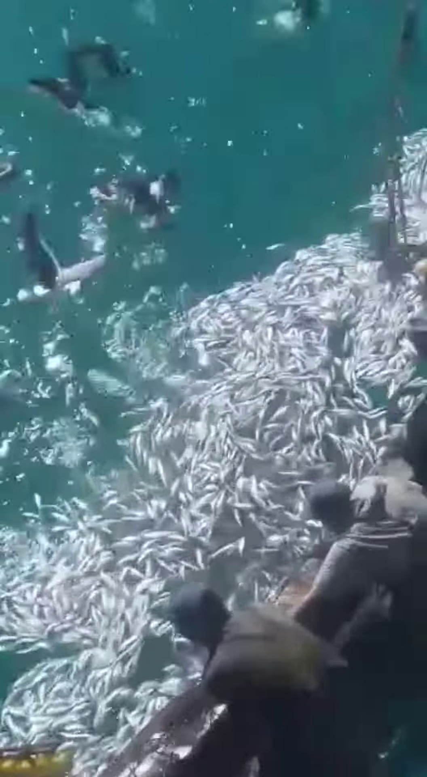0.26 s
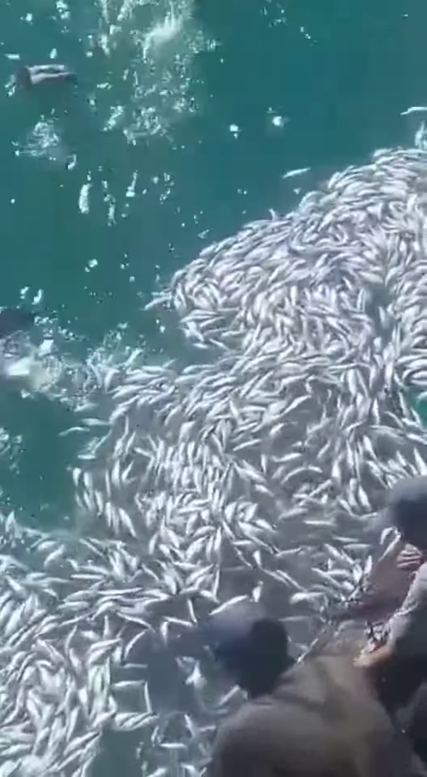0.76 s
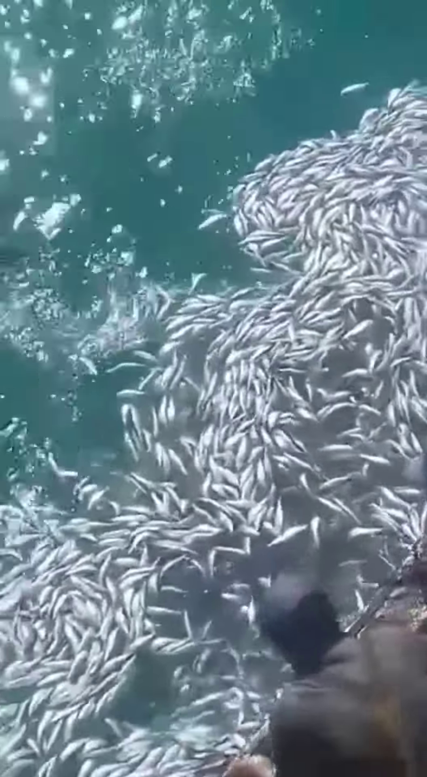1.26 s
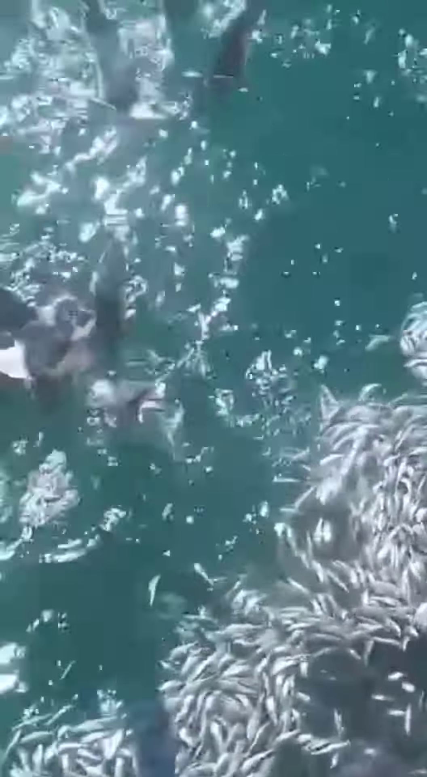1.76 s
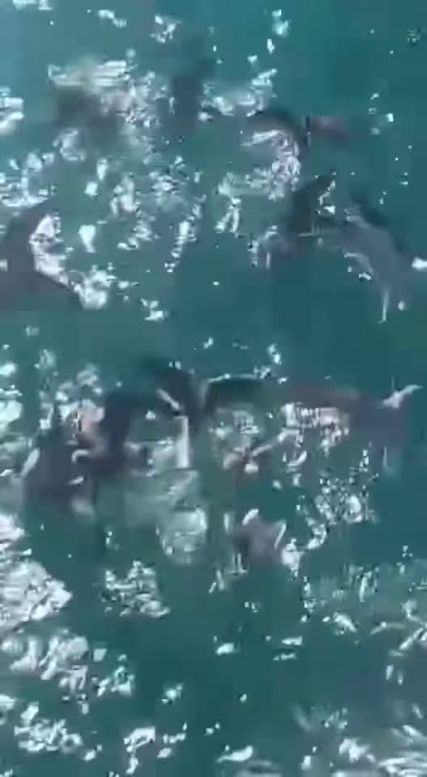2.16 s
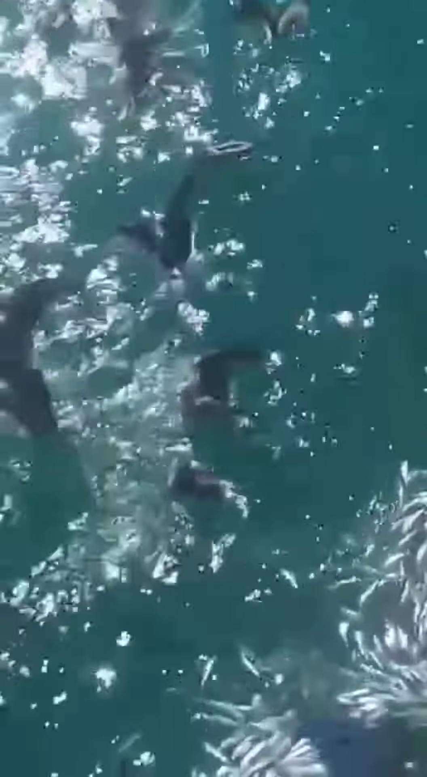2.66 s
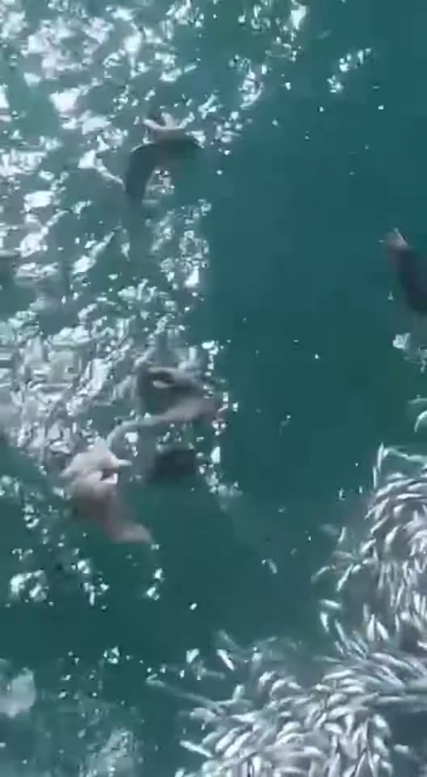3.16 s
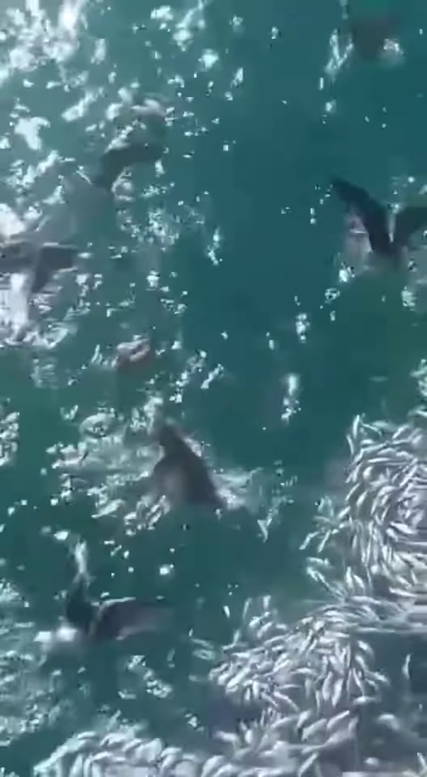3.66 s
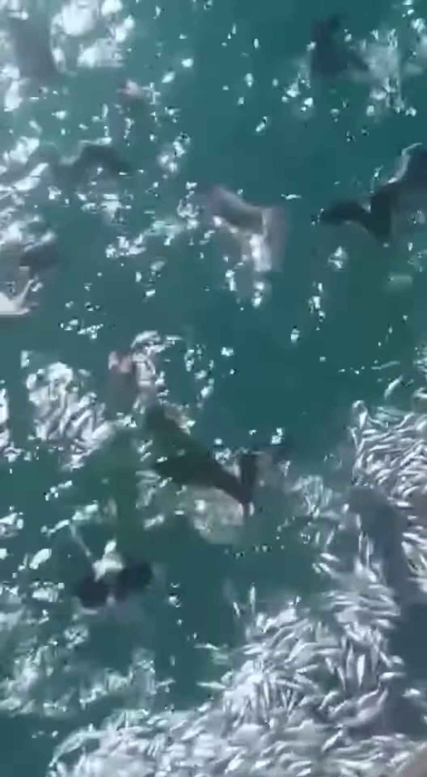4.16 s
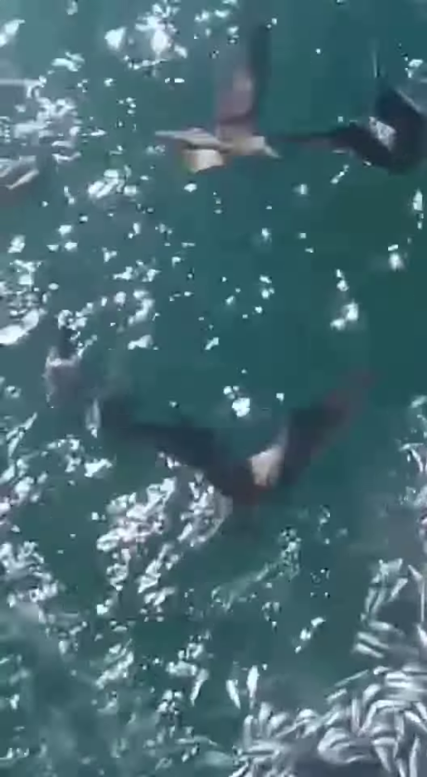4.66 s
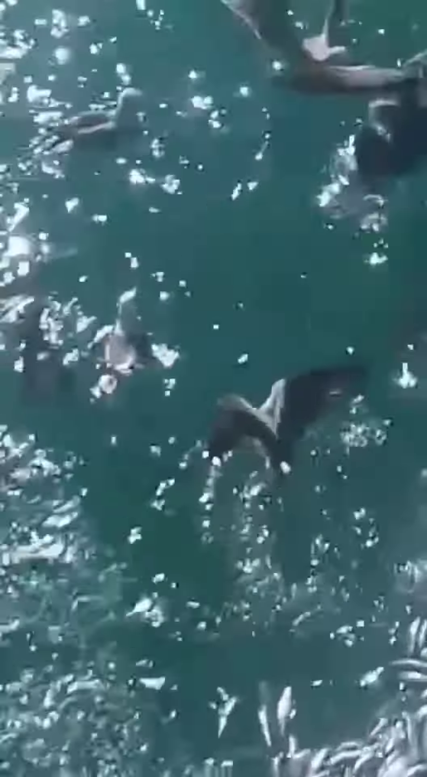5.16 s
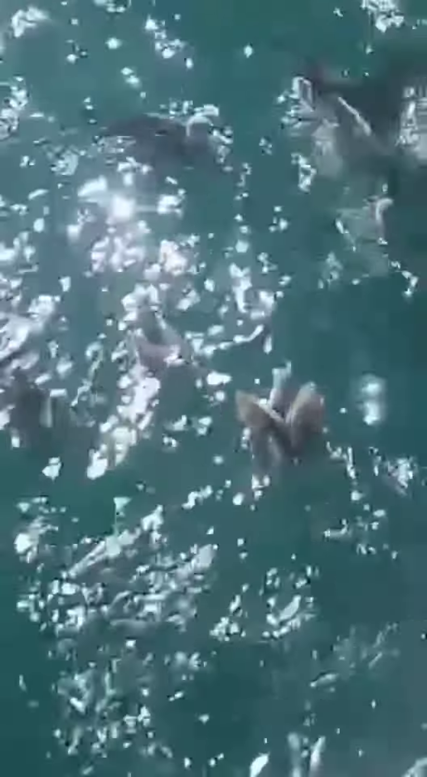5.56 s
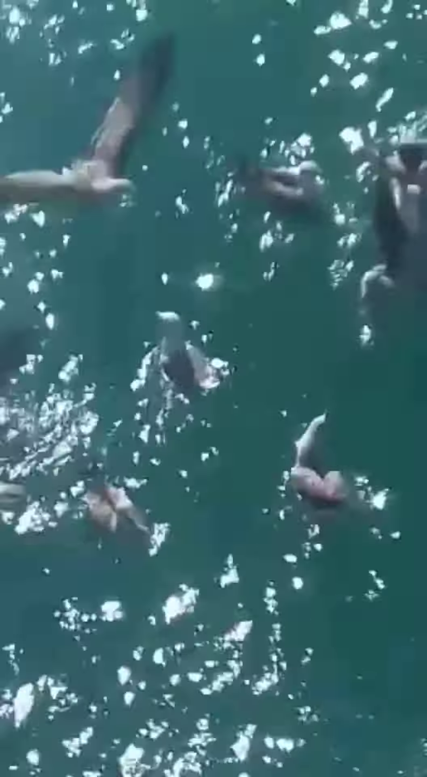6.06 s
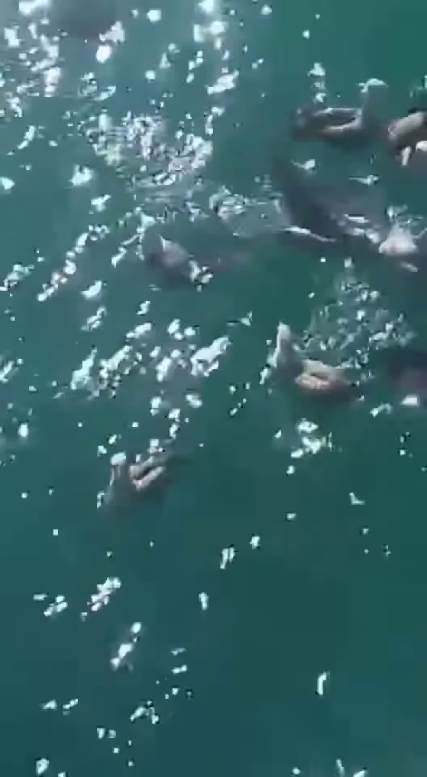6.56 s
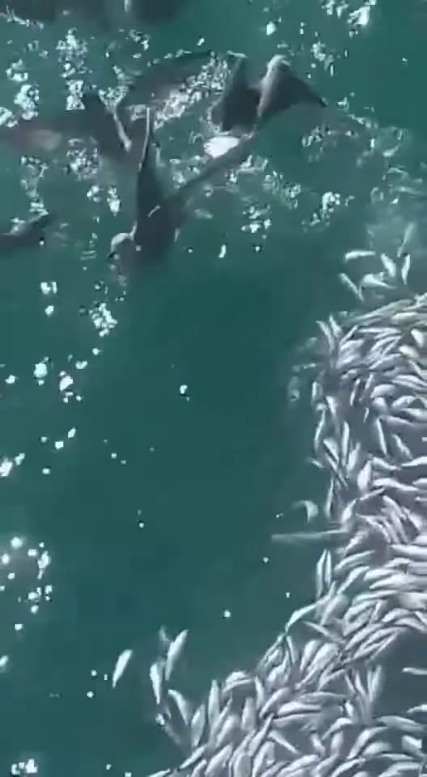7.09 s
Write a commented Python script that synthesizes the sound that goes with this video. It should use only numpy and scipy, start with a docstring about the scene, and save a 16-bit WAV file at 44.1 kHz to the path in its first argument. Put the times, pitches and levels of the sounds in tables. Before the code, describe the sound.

A huge flock of seabirds screams all at once over open water. Short, trembling near cries and rattling cackles jump out of a thick, hoarse, hissing crowd. Beneath lie a soft low wash and a faint idling engine. Small wind puffs bump the microphone early on, then dull hull knocks come, clustered past the middle. Handheld outdoor microphone on a boat, mono, no echo.

```python
"""Gulls scream over open water beside a boat: near cries stand out of a far crowd of hoarse ones.
Each cry is a trembling stack of sine partials; the crowd is about 1900 short cries mixed with hiss.
Under them lie the wash of the sea (filtered noise) and the drone of an idling engine (wavering tones).
Wind puffs (noise bursts) hit the microphone, the hull is knocked (ringing tones), and two tiny ticks sound."""
import sys
import numpy as np
from scipy import signal
from scipy.fft import rfft, irfft
from scipy.io import wavfile
from scipy.ndimage import uniform_filter1d

SR = 44100
rng = np.random.default_rng(int(sys.argv[2]) if len(sys.argv) > 2 else 0)


def bounce(signal):
    """Save signal as a 16-bit WAV file at the path given by the first command-line argument."""
    frames = np.transpose(np.atleast_2d(signal))
    limited = np.clip(frames, -1, 1)
    pcm = np.round(limited * 32767).astype(np.int16)
    wavfile.write(sys.argv[1], SR, pcm)


N = 323164  # length in samples, about 7.3 s


def amp(db):
    """Turns decibels into a plain factor."""
    return 10 ** (np.asarray(db) / 20)


def evened(x):
    """Scales a sound to an rms level of 1."""
    return x / np.sqrt(np.mean(x ** 2) + 1e-20)


def read(points, hz):
    """Reads a spectrum table, joining its points by straight lines on a log-frequency axis."""
    table_hz, value = np.transpose(points)
    return np.interp(np.log(hz + 1), np.log(table_hz + 1), value)


def add(mix, start_s, sound):
    """Adds a sound at a time, cutting what falls outside."""
    at = round(start_s * SR)
    sound = sound[max(-at, 0):]
    part = mix[max(at, 0):][:len(sound)]
    part += sound[:len(part)]


def wander(n, seconds):
    """A random curve: chance values the given time apart, joined by straight lines."""
    knots = rng.standard_normal(int(8 / seconds) if n > SR else 400)
    return np.interp(np.arange(n) / (seconds * SR), np.arange(len(knots)), knots)


def cry(hz, partials_db, jitter, flutter_db):
    """A voice as a stack of partials: the pitch trembles, the whole throbs, each partial flutters alone."""
    n = len(hz)
    shake = wander(n, 0.003966) + wander(n, 0.02003)
    turns = np.cumsum(hz * (1 + jitter * shake)) / SR + rng.random()
    throb = amp(flutter_db * wander(n, 0.00723))
    stack = np.zeros(n)
    for k, db in enumerate(np.atleast_1d(partials_db), 1):
        flutter = flutter_db * wander(n, 0.01527)
        stack += amp(db + flutter) * np.sin(2 * np.pi * k * turns)
    return throb * stack


def near_gulls():
    """Each near cry glides in pitch while it swells to its peak and fades; cackles pulse as well."""
    # near cries: start_s, length_s, first-partial from_hz and to_hz,
    # peak_db (before the voice's own partial levels), peak_place (0-1, held within 0.1-0.9), voice
    cries = [ (0.0, 0.055, 1180, 1280, -22, .4, "shrill"), (.2, 0.087, 1450, 1475, -18.5, 0.9, "pure"),
             (0.204, 0.053, 5630, 5480, -22, .45, "pure"), (0.228, 0.068, 974, 903, -15, 0.56, "nasal"),
             (0.286, .11, 1420, 1341, -23, 0.16, "open"), (.345, .105, 1250, 1110, -14.5, .3, "bright"),
             (0.329, .05, 5700, 5480, -25.5, 0.5, "pure"), (0.418, 0.14, 1700, 1630, -24, 0.5, "nasal"),
             (0.442, .13, 1420, 1330, -23.5, .5, "pure"), (0.501, 0.11, 1302, 1326, -31, .7, "open"),
             (0.728, 0.085, 1453, 1330, -18, 0, "pure"), (.782, 0.082, 1482, 1490, -28, 0.2, "open"),
             (.8, .13, 1215, 1140, -19, .5, "shrill"), (.87, 0.1, 1530, 1490, -13, 0.52, "cackle"),
             (0.904, 0.2, 1444, 1417, -15.5, 0.35, "cackle"), (.975, 0.08, 6750, 6270, -30, 0.8, "pure"),
             (1.032, 0.27, 1335, 1463, -20, .6, "cackle"), (1.054, 0.12, 2800, 2810, -24, 0.52, "cackle"),
             (1.093, .21, 1513, 1500, -22.5, 0.55, "cackle"), (1.13, 0.068, 5900, 5850, -29, 0.4, "pure"),
             (1.241, 0.027, 1580, 1790, -14.5, .6, "pure"), (1.32, .37, 1203, 1190, -14, .6, "held"),
             (1.331, 0.12, 3000, 2990, -22.5, 0.3, "pure"), (1.385, 0.035, 2276, 2120, -14, 0.4, "pure"),
             (1.653, .095, 6800, 6230, -35, 0.8, "pure"), (1.845, 0.048, 1500, 1460, -25, 0.7, "pure"),
             (1.924, 0.025, 1430, 1420, -26, 0.6, "pure"), (1.958, 0.081, 1430, 1500, -27, 0.25, "open"),
             (2.071, 0.077, 1480, 1413, -28, 0.9, "open"), (2.055, 0.079, 1789, 1810, -28.5, 0.9, "nasal"),
             (2.212, .12, 1375, 1336, -26, 0, "open"), (2.22, .13, 1290, 1189, -24.5, 0.7, "pure"),
             (2.226, 0.1, 2720, 2703, -25, 0.4, "pure"), (2.279, .09, 3040, 2970, -25, .6, "pure"),
             (2.36, 0.12, 1330, 1260, -33, 0.7, "open"), (2.407, 0.093, 1250, 1260, -21, 0.4, "nasal"),
             (2.464, 0.11, 1600, 1498, -21, 0.6, "nasal"), (2.58, 0.19, 1500, 1504, -16, .35, "cackle"),
             (2.594, 0.099, 1430, 1448, -16.5, 0.6, "pure"), (2.644, 0.093, 1300, 1275, -13, .4, "held"),
             (2.725, 0.084, 1278, 1259, -9.5, 0.2, "held"), (2.805, .1, 1490, 1440, -18, .5, "cackle"),
             (2.946, 0.21, 1422, 1296, -14, .3, "cackle"), (3.187, 0.11, 1437, 1250, -18.5, 0.4, "pure"),
             (3.279, .14, 2320, 2150, -15, 0.73, "cackle"), (3.384, .1, 1585, 1640, -24, 0.1, "pure"),
             (3.511, 0.035, 2630, 2380, -24, .4, "pure"), (3.428, .027, 1310, 1350, -15, .45, "nasal"),
             (3.455, .022, 1300, 1200, -14, .4, "nasal"), (3.478, .025, 1370, 1380, -16, .4, "nasal"),
             (3.5, .025, 1560, 1530, -16, .5, "nasal"), (3.535, .027, 1370, 1330, -16, .5, "nasal"),
             (3.56, .025, 1290, 1160, -14, .5, "nasal"), (3.572, 0.26, 2580, 2417, -13, .35, "cackle"),
             (3.601, 0.11, 1510, 1530, -29, 0.6, "open"), (3.639, 0.1, 2524, 2300, -35, 0.7, "pure"),
             (3.847, 0.26, 1510, 1310, -18, 0.63, "pure"), (3.911, .11, 1410, 1294, -24.5, 0.33, "shrill"),
             (3.888, 0.13, 2900, 2560, -16, 0.64, "cackle"),
             (3.975, 0.093, 2470, 2590, -16.5, 0.53, "pure"), (3.97, .07, 6300, 6600, -36, .6, "pure"),
             (4.022, 0.3, 1650, 1393, -23, 0.97, "reedy"), (4.074, .035, 2620, 3070, -17, 0.3, "pure"),
             (4.118, 0.059, 2900, 2520, -14, 0.8, "pure"), (4.214, 0.091, 1100, 1060, -19, 0.4, "nasal"),
             (4.16, 0.17, 2960, 2960, -12, 0.3, "cackle"), (4.258, 0.29, 2936, 2680, -17.5, 0.2, "cackle"),
             (4.3, 0.15, 1568, 1487, -24, 1, "pure"), (4.361, 0.095, 1850, 1790, -25, 0.2, "nasal"),
             (4.405, 0.065, 1440, 1464, -27, 0.7, "shrill"), (4.444, 0.14, 2390, 2270, -20.5, .5, "pure"),
             (4.512, 0.16, 1460, 1365, -24.5, .7, "pure"), (4.663, 0.12, 1290, 1455, -22, 0, "open"),
             (4.756, 0.16, 1416, 1317, -23.5, 0, "open"), (4.706, 0.037, 5630, 5600, -28.5, 0.65, "pure"),
             (4.717, .1, 1825, 1730, -17.5, .3, "pure"), (4.901, .2, 1395, 1377, -21, .5, "cackle"),
             (4.875, 0.064, 3250, 3320, -25, .5, "pure"), (4.95, 0.063, 3300, 3350, -19, 0.62, "pure"),
             (4.875, 0.22, 1924, 1760, -13.5, 0.3, "cackle"),
             (4.991, 0.12, 2486, 2250, -15.5, 0.45, "pure"), (5.209, 0.14, 2510, 2870, -17.5, 0.67, "pure"),
             (5.3, .16, 2880, 2730, -16.5, 0.64, "pure"), (5.4, .13, 3420, 3280, -27, .6, "pure"),
             (5.397, 0.19, 1435, 1430, -22.5, 0.36, "pure"), (5.468, 0.23, 1516, 1420, -13, .55, "cackle"),
             (5.59, 0.061, 1370, 1350, -28, 1, "open"), (5.778, 0.11, 1450, 1353, -19.5, 1, "pure"),
             (5.834, 0.14, 1485, 1394, -31, .5, "open"), (5.987, 0.13, 1280, 1205, -23.5, 0, "pure"),
             (6.023, 0.092, 1680, 1560, -24.5, 0.85, "nasal"), (6.134, 0.067, 2350, 2280, -21, .5, "pure"),
             (6.241, 0.069, 2390, 2460, -21.5, 0.34, "cackle"),
             (6.342, 0.074, 2470, 2510, -24, 0.6, "pure"), (6.405, 0.18, 1370, 1300, -23, 0.47, "cackle"),
             (6.512, 0.14, 7000, 6750, -45, 0.4, "pure"), (6.52, .19, 1310, 1175, -23, .55, "held"),
             (6.524, 0.085, 3640, 3370, -35, .6, "pure"), (6.589, 0.11, 1135, 1364, -20, 0, "cackle"),
             (6.673, 0.068, 1010, 1120, -26, 0, "pure"), (6.962, 0.2, 2410, 2370, -19.5, 0.57, "cackle"),
             (7.12, .05, 6600, 7000, -46, .5, "pure"), (7.144, 0.024, 2230, 1890, -16, 0.85, "pure"),
             (7.197, 0.031, 2130, 1840, -17.5, 0.8, "pure"), (7.22, .09, 2830, 2860, -22.5, 0.8, "pure"),
             (7.254, .035, 2505, 2650, -13.5, 0.24, "pure"), (7.292, 0.041, 2570, 2710, -14, .6, "pure"), ]
    # kinds of voice: name, then the level_db of each partial, lowest first
    voices = {"pure": (0,), "open": (5, -1, -7, -12.5, -59), "nasal": (-36, -2, -28, -14.5, -48, -33.5),
              "shrill": (-10, -4, 0, -15), "bright": (-8, 0, -11, -7, -24, -20, -24, -31),
              "held": (-33, -3, -17, -24.5, -30, -38.5), "reedy": (-28, 3, -33, -11.5, -30, -26),
              "cackle": (0,)}
    swell_db, fade_db = 6.5, 10  # how far below its peak a cry begins and ends
    ends_s = 0.018  # longest soft end; short cries use a quarter of their length
    glide = .85  # below 1 the pitch moves fastest at the start
    cackle_per_s, cackle_bend, cackle_db = 29, .018, 4  # pulse rate, pitch bend (share), level swing each way

    out = np.zeros(N)
    for start_s, length_s, from_hz, to_hz, peak_db, peak_at, kind in cries:
        t = np.arange(0, length_s, 1 / SR)
        u = t / length_s
        peak_at = np.clip(peak_at, .1, .9)
        cackles = kind == "cackle"
        pulse = cackles * np.cos(2 * np.pi * cackle_per_s * (t - peak_at * length_s))
        # the slope of the pulse, scaled to the range -1 to 1, bends the pitch
        slope = np.gradient(pulse) * SR / (2 * np.pi * cackle_per_s)
        hz = (from_hz + (to_hz - from_hz) * u ** glide) * (1 + cackle_bend * slope)
        db = peak_db - np.interp(u, [0, peak_at, 1], [swell_db, 0, fade_db])
        db = db + cackle_db * (pulse - cackles)
        voice = cry(hz, voices[kind], jitter=.004, flutter_db=1.6)
        ends = np.minimum(np.minimum(t, length_s - t) / min(ends_s, length_s / 4), 1)
        add(out, start_s, amp(db) * voice * np.sin(np.pi / 2 * ends) ** 2)
    return out


def crowd_cries():
    """Short cries at chance moments arch and mostly fall in pitch, while pitch and strength pulse."""
    cries_per_s, span_s = 250, 7.6
    out = np.zeros(N)
    # each row of chance numbers is one cry; the last nine set its partials, two of them its pulse too
    for at, long, pitch, fall, loud, *throat in rng.random((int(cries_per_s * span_s), 14)):
        u = np.linspace(0, 1, int(SR * (.035 + .14 * long ** 2)))
        hz = 980 * 2 ** (.8 * pitch) * (1 + .04 * np.sin(np.pi * u) - 0.094 * fall * u)
        pulses_per_s = 18 + 22 * throat[0]
        beat = 2 * np.pi * (np.arange(len(u)) * pulses_per_s / SR + throat[1])
        hz = hz * (1 + .014 * fall * np.sin(beat))
        cackle = 1 + .45 * np.cos(beat)
        voice = cry(hz, -18 * np.array(throat), jitter=.009, flutter_db=2.5)
        swell = abs(np.sin(np.pi * u)) ** 0.1
        add(out, span_s * at - .25, amp(6.6 * loud) * cackle * voice * swell)
    return out


def crowd():
    """The far cries and a hiss share one tone colour, then follow a changing level and treble tilt."""
    # the crowd over time: time_s, level_db (before the 1.5 dB cut at the end), treble_tilt_db per octave
    crowd_course = [(0.0, -16, -3.5), (0.3, -18, 2), (0.57, -20.5, 2), (1.63, -18, 1), (1.79, -25.5, -0.5),
                    (1.98, -20, -1.5), (2.08, -24, 6), (2.12, -20.5, 2), (2.62, -14.5, 0.5),
                    (3.12, -18.5, 1.3), (3.18, -20.5, 2.5), (3.45, -21.5, -1.3), (3.69, -17.5, -1.7),
                    (3.84, -20.5, 1), (3.95, -18, -.5), (4.14, -19, 2.5), (4.6, -19.5, 0), (5.0, -18.5, 2),
                    (5.39, -17, 0), (5.95, -20.5, 2.5), (6.37, -22, 0.5), (6.45, -28, -0.5),
                    (6.86, -23.5, -0.5), (7.07, -27.5, -1.2), (7.33, -22.5, 2.5)]
    # tone colour of the crowd: pitch_hz, relative level_db per Hz
    crowd_colour = [(260, -23), (450, -53), (614, -6), (671, -10), (734, -26.5), (1080, -17), (1430, -1),
                    (1780, -3), (2430, 0.5), (3740, -14), (5340, -19.5), (7280, -29.5), (8700, -31.5),
                    (15500, -56.5)]
    hz, t, z = signal.stft(crowd_cries(), SR, nperseg=1024, noverlap=768)

    # flatten the cries' average spectrum, then colour them together with hiss
    z /= uniform_filter1d(np.sqrt((abs(z) ** 2).mean(1)), size=9)[:, None] + 1e-9
    blur = (rng.standard_normal(z.shape) + 1j * rng.standard_normal(z.shape)) / np.sqrt(2)
    voiced = (hz > 1000) / (1 + (hz / 11500) ** 4)  # below and far above the voices only hiss is left
    z = amp(read(crowd_colour, hz))[:, None] * (z * voiced[:, None] + amp(-3) * blur)
    z /= np.sqrt(uniform_filter1d((abs(z) ** 2).mean(0), size=40))  # even out the level over time

    time_s, level_db, tilt_db = np.transpose(crowd_course)
    flicker_db = 1.06 * wander(N, 0.044)[np.minimum(t * SR, N - 1).astype(int)]  # the treble flickers
    octaves = np.log2(np.clip(hz, 3000, 10000) / 3000)[:, None]
    tilt = amp(octaves * (np.interp(t, time_s, tilt_db) + flicker_db))
    shaped = z * tilt * amp(np.interp(t, time_s, level_db))
    flat = signal.istft(z, SR, nperseg=1024, noverlap=768)[1][:N]
    sound = signal.istft(shaped, SR, nperseg=1024, noverlap=768)[1][:N]
    return amp(-1.5) * sound / np.sqrt(np.mean(flat ** 2))


def sea():
    """Low wash of water along the hull: noise shaped by a spectrum, lumpy in time."""
    # tone colour of the wash: pitch_hz, relative level_db per Hz
    wash_colour = [(13, -38), (22, -9.5), (129, -2.5), (179, -3), (307, 1.5), (447, -7), (535, -9),
                   (673, -8), (767, -4), (1100, -10), (1430, -62), (2420, -120)]
    colour = amp(read(wash_colour, np.fft.rfftfreq(N, 1 / SR)))
    wash = irfft(rfft(rng.standard_normal(N)) * colour, N)
    lumps_db = 1.2 * wander(N, .05)
    return amp(-35 + lumps_db) * evened(wash)


def engine():
    """Low engine tones whose strength and phase waver."""
    # engine tones: pitch_hz, level_db (rms, before the wavering)
    tones = [(34.8, -58), (52.2, -76), (70, -58), (140, -49), (312, -48), (678, -46.5)]
    t = np.arange(N) / SR
    out = np.zeros(N)
    for hz, db in tones:
        strength = np.sqrt(2) * amp(db + 3.6 * wander(N, .06))
        phase = 0.28 * wander(N, .05)  # radians
        out += strength * np.sin(2 * np.pi * hz * t + phase)
    return out


def wind():
    """Each puff on the microphone is a short burst of low noise with soft ends."""
    # wind puffs: start_s, level_db (rms before the soft ends), top_hz (at least 140 is used),
    # length_s (cut to 0.136 s at most)
    puffs = [(0.0, -38, 170, .3), (0.104, -25, 320, 0.029), (0.172, -15.5, 444, 0.023),
             (0.194, -27, 398, 0.019), (0.238, -32, 340, 0.026), (0.825, -20.5, 450, 0.045),
             (0.933, -33, 250, 0.04), (2.07, -37.5, 400, 0.13), (2.534, -26, 1030, 0.041),
             (3.1, -36, 248, 0.11), (4.308, -30, 177, 0.039), (5.475, -28, 503, 0.022)]
    out = np.zeros(N)
    for start_s, db, top_hz, length_s in puffs:
        band = signal.butter(3, [98, max(top_hz, 140)], "bandpass", fs=SR, output="sos")
        gust = signal.sosfilt(band, rng.standard_normal(8000))
        burst = gust[2000:][:int(length_s * SR)]  # skip the filter's start
        add(out, start_s, amp(db) * evened(burst) * signal.windows.tukey(len(burst), .3))
    return out


def hull():
    """Each knock swells within a few milliseconds and rings out as one dying tone."""
    # knocks on the hull: start_s, level_db (before swell and decay), ring_hz, time to fall by 60 dB in s
    knocks = [(2.102, -22, 365, 0.16), (2.25, -22.5, 221, 0.38), (2.279, -21.5, 374, 0.18),
              (2.877, -26.5, 308, 0.23), (3.944, -18, 373, 0.18), (4.236, -23, 358, 0.057),
              (4.293, -18, 336, 0.16), (4.363, -19, 315, 0.3), (4.412, -8, 316, 0.097),
              (4.437, -17.5, 377, 0.16), (4.465, -12, 344, 0.039), (4.674, -19, 332, 0.082),
              (4.703, -19, 315, 0.1), (6.54, -24.5, 703, 0.37)]
    out = np.zeros(N)
    t = np.arange(SR // 3) / SR
    for start_s, db, hz, t60 in knocks:
        swell = 1 - np.exp(-t / 0.0011)
        add(out, start_s, amp(db - 60 * t / t60) * swell * np.sin(2 * np.pi * hz * t))
    return out


def ticks():
    """Tiny sparks of treble noise that die within a few milliseconds."""
    # ticks: start_s, level_db (of the noise before its treble is sharpened)
    sparks = [(0.9383, -56), (5.3477, -51)]
    out = np.zeros(N)
    t = np.arange(200) / SR
    for start_s, db in sparks:
        treble = np.diff(rng.standard_normal(202), 2)  # differencing twice favours the treble
        add(out, start_s, amp(db) * treble * np.exp(-t / .0012))
    return out


def scene():
    """All the sources added together, as one channel."""
    return (near_gulls() + crowd() + sea() + engine() + wind() + hull() + ticks())[None]


def record(dry):
    """The microphone drops the deepest bass and hisses, the input rounds off peaks, then the top is cut."""
    bass_cut = signal.butter(4, 28, "highpass", fs=SR, output="sos")
    cut = signal.sosfilt(bass_cut, dry)
    cut = cut + amp(-65) * rng.standard_normal(N)  # steady hiss
    rounded = cut / (1 + (abs(cut) / .6) ** 4) ** .25  # peaks stay below 0.6
    top_cut = signal.firwin(1023, 15600, window=("kaiser", 9), fs=SR)
    return signal.oaconvolve(rounded, top_cut[None], "same")


dry = scene()
out = record(dry)
bounce(out)
```